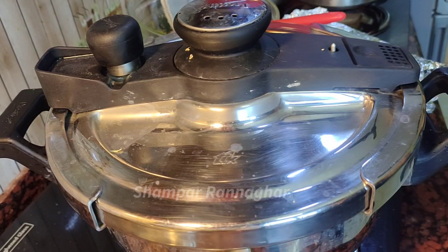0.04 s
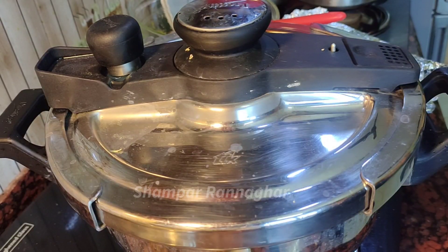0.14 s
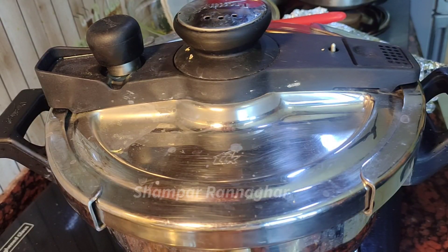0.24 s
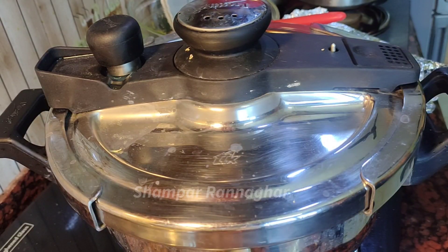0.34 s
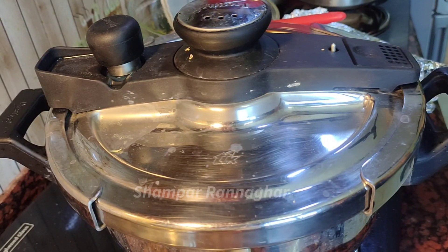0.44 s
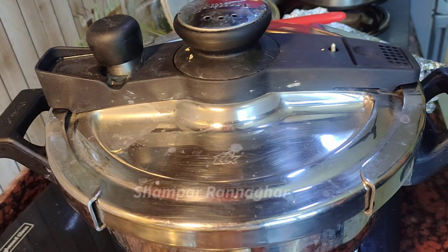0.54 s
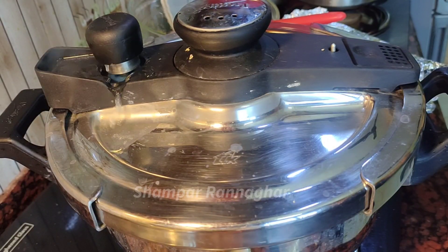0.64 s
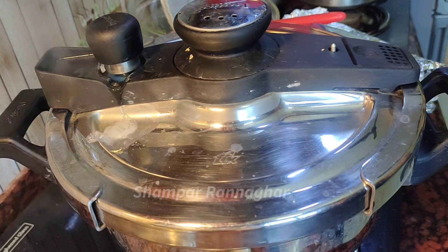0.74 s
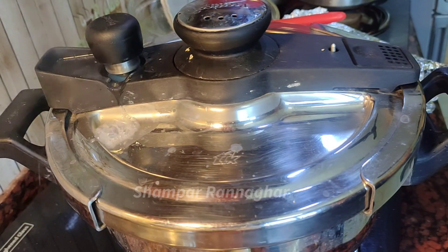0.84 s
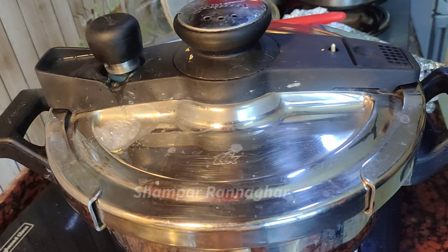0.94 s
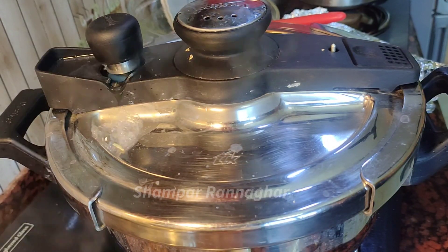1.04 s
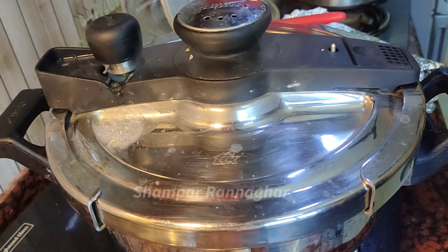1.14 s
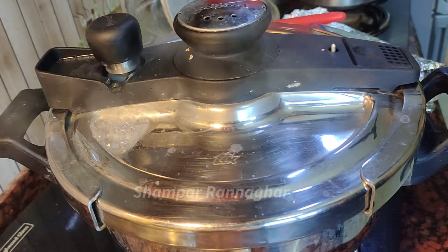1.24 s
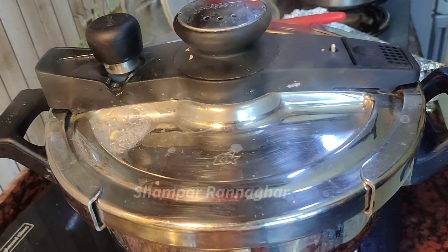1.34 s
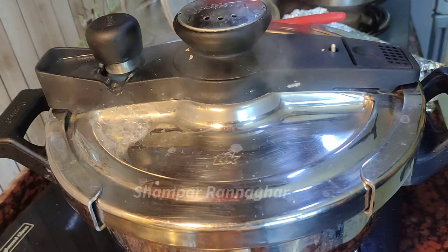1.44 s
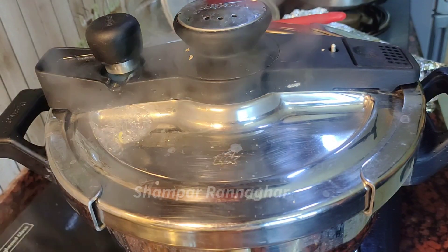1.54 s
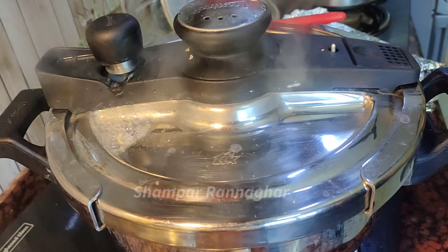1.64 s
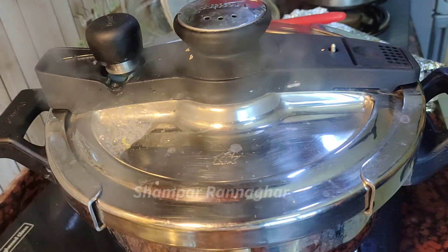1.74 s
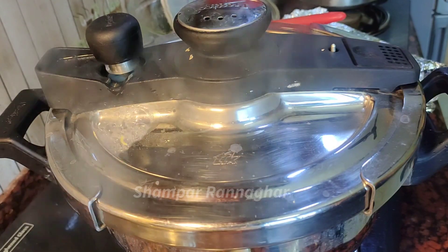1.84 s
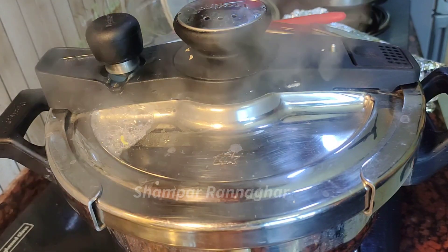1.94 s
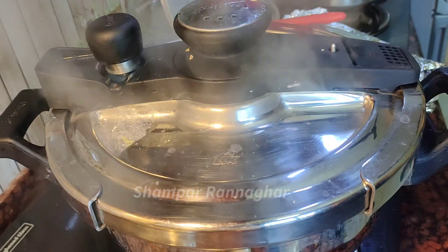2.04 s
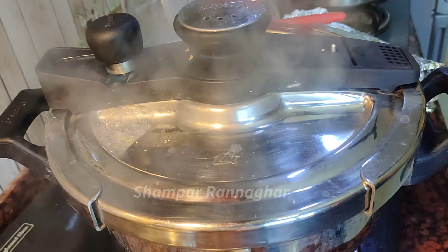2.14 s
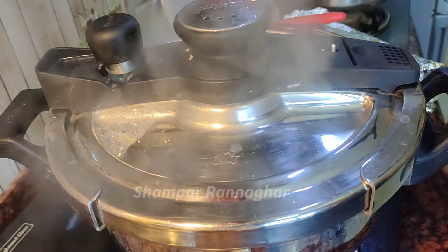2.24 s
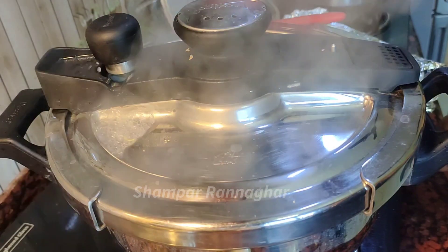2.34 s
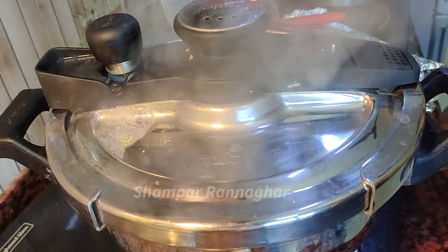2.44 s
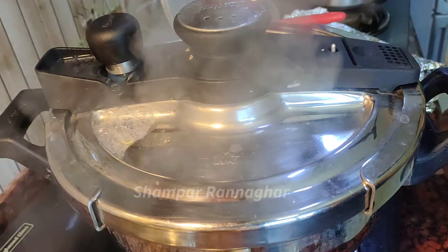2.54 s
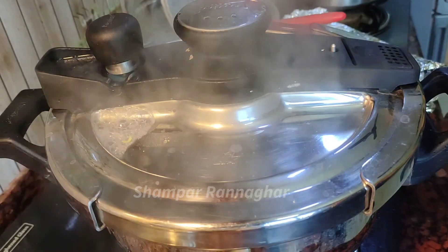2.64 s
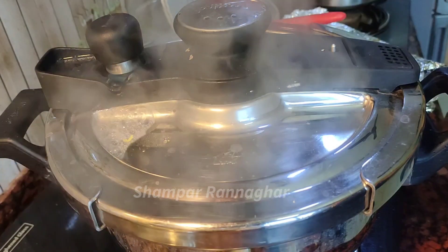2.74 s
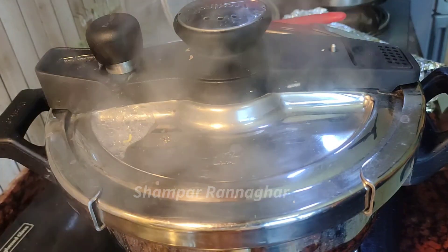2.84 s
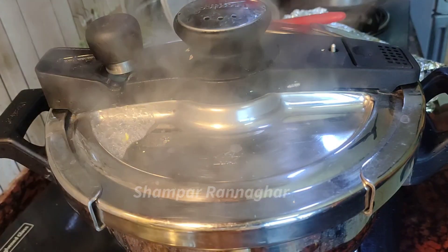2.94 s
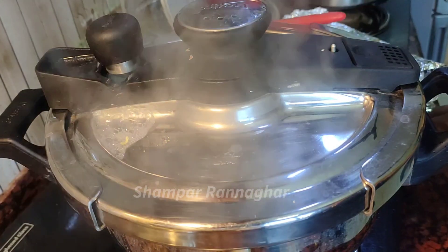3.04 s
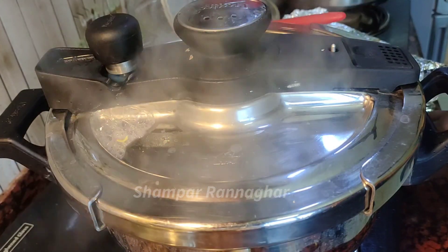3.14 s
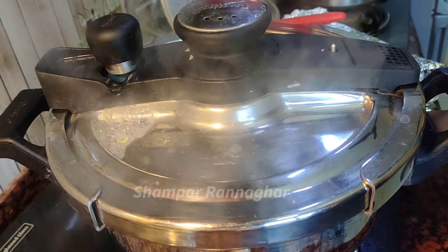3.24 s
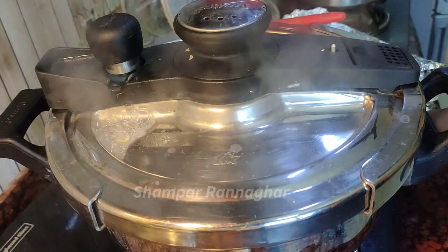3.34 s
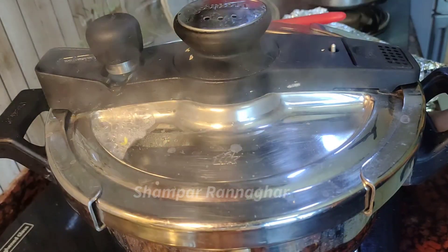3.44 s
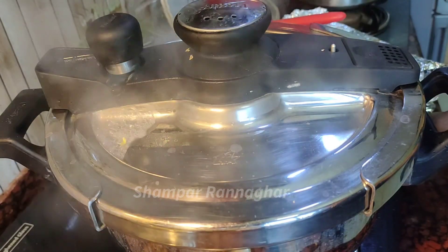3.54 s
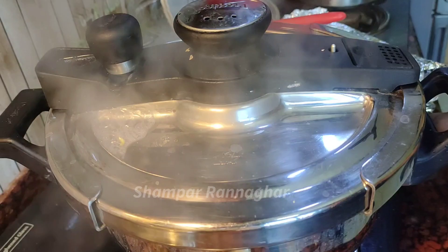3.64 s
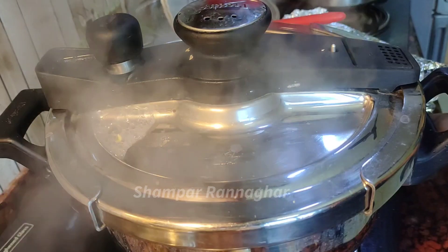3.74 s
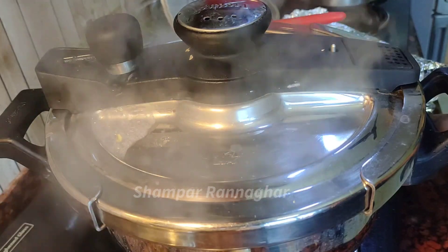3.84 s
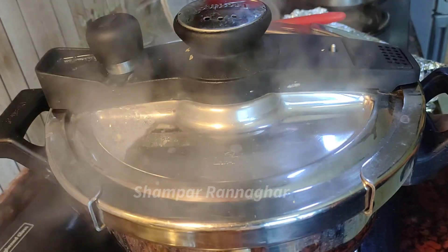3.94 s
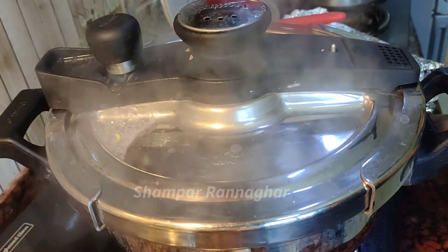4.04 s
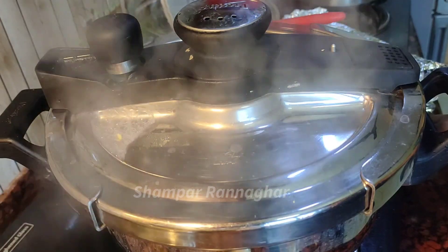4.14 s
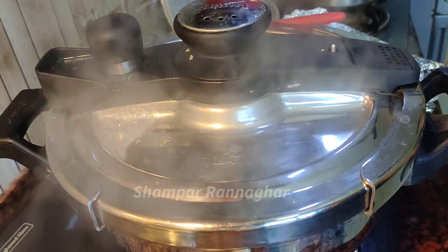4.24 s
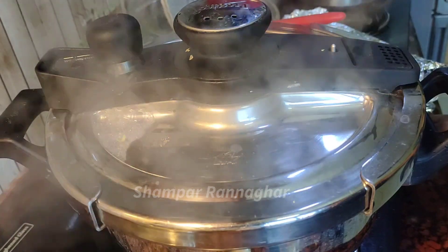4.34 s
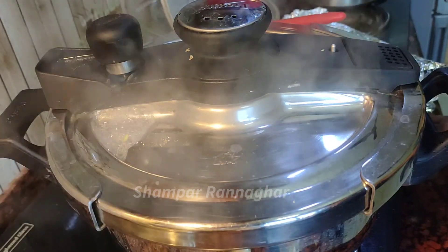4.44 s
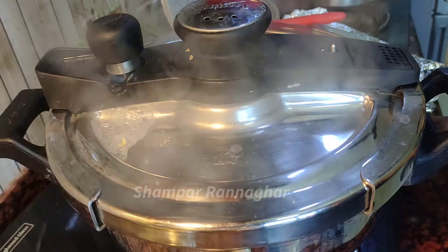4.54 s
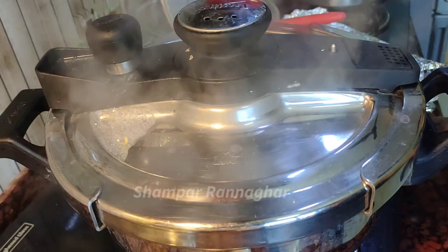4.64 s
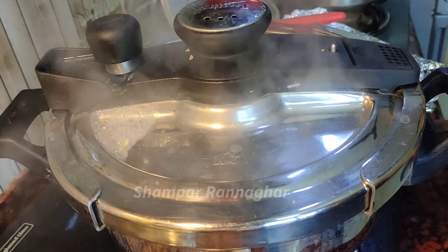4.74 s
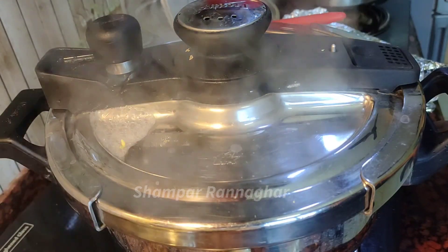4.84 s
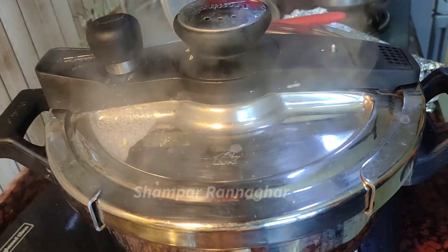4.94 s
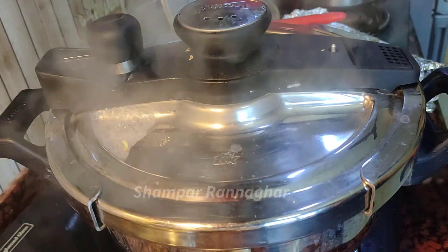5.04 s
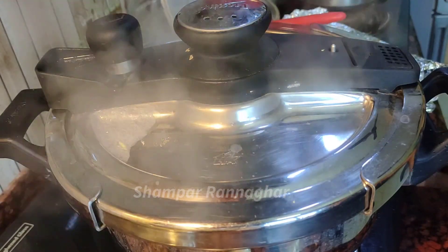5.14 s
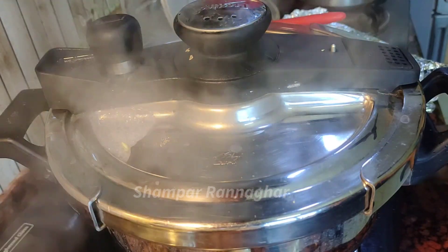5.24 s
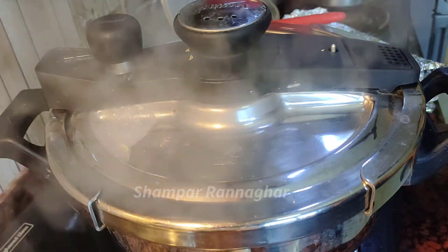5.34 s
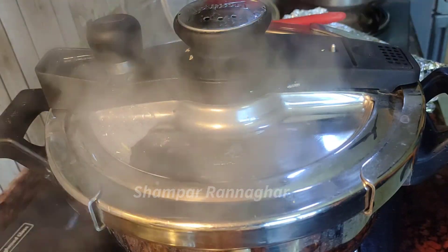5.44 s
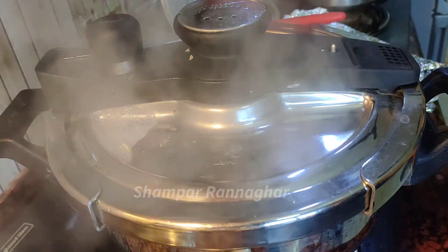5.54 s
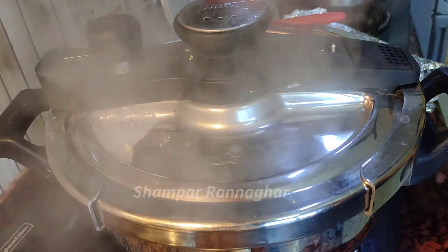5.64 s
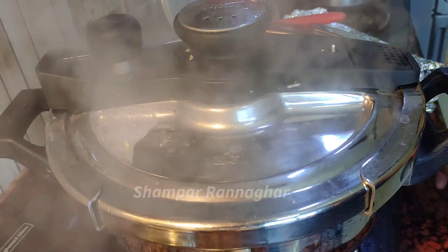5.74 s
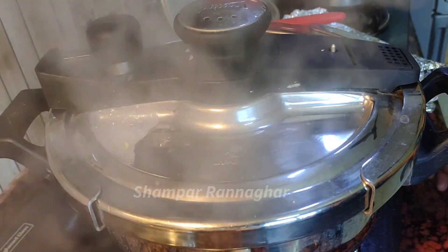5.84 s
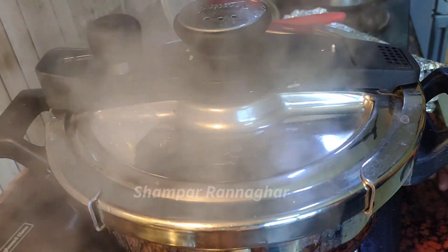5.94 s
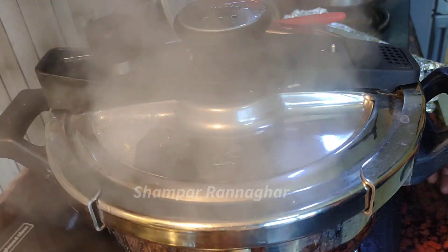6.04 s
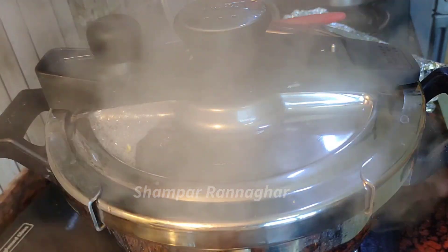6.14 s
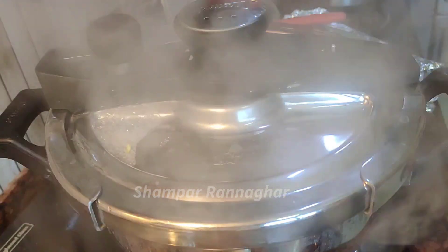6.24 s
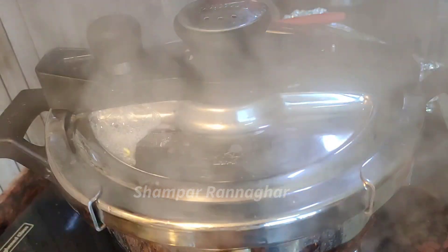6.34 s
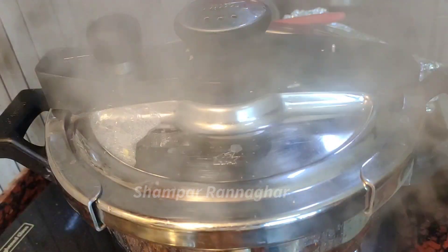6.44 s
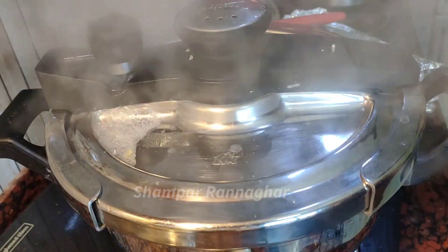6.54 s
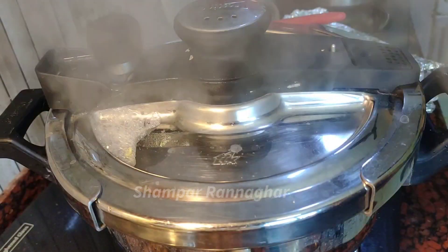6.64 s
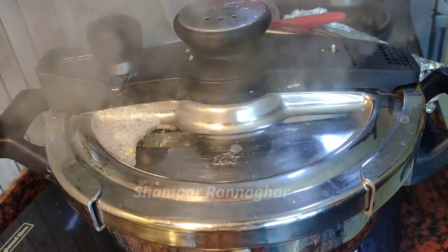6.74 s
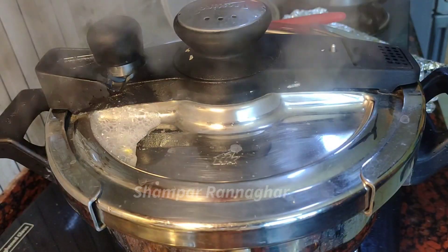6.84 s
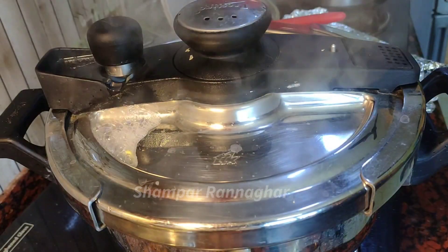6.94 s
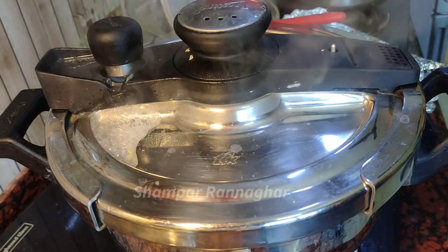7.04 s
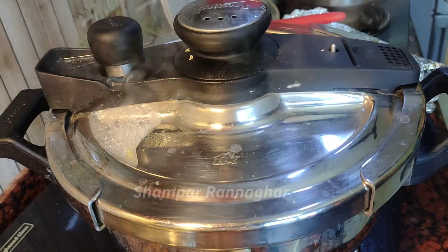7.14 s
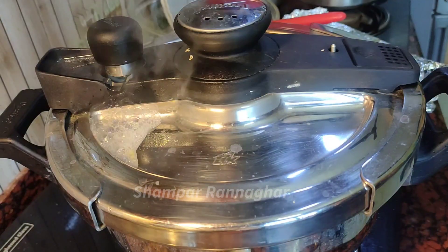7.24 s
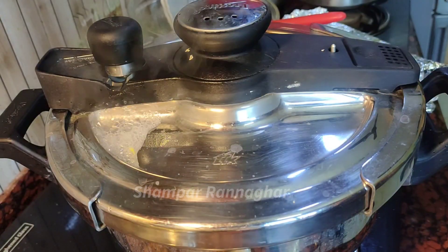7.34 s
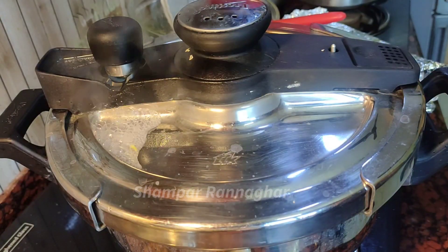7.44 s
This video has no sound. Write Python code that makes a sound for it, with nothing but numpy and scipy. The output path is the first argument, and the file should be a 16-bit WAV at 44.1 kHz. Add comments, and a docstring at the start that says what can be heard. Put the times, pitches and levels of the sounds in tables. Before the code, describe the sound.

A pressure cooker gives off a soft, thin hiss over the low rumble of a stove. At about 0.7 seconds the weight lifts with a short spit of water, and the steam surges into a loud, bright, wet jet. A high, wavering whistle and a metallic ring from the valve sit inside the hiss, the whistle strongest at the start. The blast holds with a slight flutter, pushing the stove rumble into the background, and weakens a little in its last couple of seconds. At about 6.3 seconds something knocks once near the pot. At about 6.9 seconds the weight sinks back and the jet dies quickly with another small wet puff. A faint, dull hiss and the stove rumble remain until the sound ends at about 7.4 seconds. Everything is close, with the short echo of a small kitchen.

```python
"""A pressure cooker hisses, blasts steam for about six seconds, then drops back to a faint, dull hiss.
Steam leaks past the seated weight, lifts it and escapes as a turbulent, wet jet that rings the valve
and whistles in the vent pipe until the weight sinks back. Water spits at lift and landing. Something
knocks once near the pot. The stove rumbles underneath, ducked by gain control during the blast."""
import sys
import numpy as np
from scipy import signal
from scipy.fft import rfft, irfft
from scipy.io import wavfile
from scipy.ndimage import uniform_filter1d

SR = 44100
rng = np.random.default_rng(int(sys.argv[2]) if len(sys.argv) > 2 else 0)


def master_out(mix):
    """Clip the mix to full scale and print it as 16-bit PCM to the path in sys.argv[1]."""
    frames = np.transpose(np.atleast_2d(mix))
    ceiling = np.clip(frames, -1, 1)
    pcm = np.round(ceiling * 32767).astype(np.int16)
    wavfile.write(sys.argv[1], SR, pcm)


N = 330564
TIME_S = np.arange(N) / SR
FREQ_HZ = np.maximum(np.arange(N // 2 + 1) * SR / N, 1)
OPEN_S, CLOSE_S, END_S = 0.686, 6.927, 7.39  # weight lifts, weight sinks, sound ends


def jet():
    """Turbulence and torn droplets ring the valve; eddies make each band flutter on its own."""
    # Jet spectrum. Each row: frequency in Hz, relative level in dB.
    spectrum = [(600, -22), (1300, -16.5), (2050, -14.5), (2400, -11.5), (3400, -9), (3750, -6.5),
                (5500, -6), (6400, 1), (7600, 0.5), (7950, -14), (8400, -32)]
    # Resonances of valve, hollow and lid. Each row: frequency in Hz, width in Hz, lift in dB.
    valve_modes = [(840, 29, 4), (1007, 32, 6), (1080, 27, 6), (2146, 27, 8), (2356, 44, 13),
                   (2495, 68, 9.5), (2534, 120, 7.5), (2686, 53, 13.5), (2850, 42, 11), (2917, 67, 11.5),
                   (3104, 43, 13.5), (3210, 39, 11), (3334, 46, 12.5), (3446, 80, 11), (3680, 18, 8.5),
                   (3940, 27, 3.5), (4040, 30, 11), (4223, 170, 5.5), (4160, 52, 4), (4410, 46, 6.5),
                   (4887, 41, 8), (5000, 69, 5.5), (5263, 72, 9), (5740, 171, 5), (6645, 210, 4),
                   (6920, 99, 1), (7180, 170, 2)]
    # Envelopes of roar, middle hiss and top hiss. Each row: full-pressure level in dB, lead in s,
    # rise in s, loss over the blast in dB, closing fall in dB/s.
    envelopes = [(-15, -0.003, 0.083, 5, 145), (-17.5, .002, 0.14, 2.4, 168), (-12, .022, .165, 6, 149)]
    source = rng.standard_normal(N) + undb(-12) * spray(rate_per_s=1500, spread_db=4.5)
    steam = colour(source, spectrum, valve_modes)
    edges_hz = [2, 2000, 3000, 3800, 5800, 6900, 20000]
    bands = []
    for low_hz, high_hz in zip(edges_hz, edges_hz[1:]):
        flutter_db = 0.25 * walk(1.4) + 0.48 * walk(9.6) + 0.6 * walk(60)
        bands.append(band(steam, low_hz, high_hz) * undb(flutter_db))
    registers = sum(bands[:3]), bands[3], sum(bands[4:])
    blast = sum(unit(part) * undb(db) * flow(*shape) for part, (db, *shape) in zip(registers, envelopes))
    return blast * undb(0.16 * walk(40))  # the dancing weight throttles the jet


def spray(rate_per_s, spread_db):
    """Droplets burst at random times with very uneven sizes."""
    hits = rng.random(N) < rate_per_s / SR
    sizes = undb(spread_db * np.minimum(rng.exponential(size=N), 4))
    return unit(hits * sizes * rng.choice([-1, 1], N))


def flow(lead_s, rise_s, loss_db, fall_db_per_s):
    """Steam rises as the weight lifts, sags with pressure, dies on closing; lead_s extends both ends."""
    open_for_s = np.maximum(TIME_S - OPEN_S + lead_s, 0)
    closed_for_s = np.maximum(TIME_S - CLOSE_S - lead_s, 0)
    spent = np.minimum(open_for_s / (CLOSE_S - OPEN_S), 1) ** 2.9  # pressure falls ever faster
    return (1 - np.exp(-open_for_s / rise_s)) * undb(-loss_db * spent - fall_db_per_s * closed_for_s)


def whistle():
    """While the weight is up, eddies at the mouth sound the vent pipe and the hollow around it."""
    fresh = np.exp(-np.maximum(TIME_S - OPEN_S, 0) / 0.6)
    handover = swell(at_s=2.8, half_s=0.7)  # the pipe yields to the hollow for a while
    pipe_db = -24 + 6 * fresh - 5.5 * handover + 1.5 * walk(5)
    pipe = waver(hz=3449, width_hz=44) * undb(pipe_db)
    hollow = waver(hz=1542, width_hz=80) * undb(-34.5 + 4.5 * handover)
    # The notes need a wide gap: they start after the jet and end before it.
    return (pipe + hollow) * flow(lead_s=-0.028, rise_s=0.086, loss_db=2, fall_db_per_s=190)


def waver(hz, width_hz):
    """Turbulence keeps a resonance ringing unsteadily; the flow limits its loudest swings."""
    pole = np.exp((2j * np.pi * hz - np.pi * width_hz) / SR)
    ring = signal.lfilter([1], [1, -pole], rng.standard_normal(N))
    return unit(ring.real / (1 + 0.1 * unit(np.abs(ring))))


def leak():
    """Steam hisses under the seated weight, thins towards the lift and returns duller on the wet seat."""
    # Spectra of the thin gap and the wet seat. Each row: frequency in Hz, relative level in dB.
    thin_spectrum = [(1200, -15.5), (2050, -12.5), (2550, -6.5), (3000, -7.5), (3500, -9), (3900, -14),
                     (4800, -12.5), (5500, -10), (6100, -3), (7300, -3), (7620, -5.5), (7950, -20),
                     (8500, -36.5)]
    wet_spectrum = [(500, -11.5), (750, -2), (1000, -14), (1400, 1), (2000, -9), (3350, -5.5), (5050, -10),
                    (5800, -8), (6700, -7), (7500, -15), (8500, -44)]
    # Gap resonances. Each row: frequency in Hz, width in Hz, lift in dB.
    gap_modes = [(1290, 30, 16.5), (2720, 120, 7), (2960, 67, 4.5), (5330, 130, 7.5), (5780, 240, 7),
                 (6280, 220, 1.5), (6700, 130, 0), (6780, 150, 7), (7230, 160, 5.5)]
    thinning_db = 4 * np.exp(np.minimum(TIME_S - OPEN_S, 0) / 0.24)
    before = colour(rng.standard_normal(N), thin_spectrum, gap_modes) * undb(-28.5 - thinning_db)
    after = colour(rng.standard_normal(N), wet_spectrum) * undb(-40.5)
    hiss = before * (1 - ramp(OPEN_S + 0.02, 0.02)) + after * ramp(CLOSE_S, 0.03)
    return hiss * undb(0.43 * walk(35))


def spit():
    """Condensed water puffs from the vent as the weight lifts and lands."""
    # Water puffs. Each row: start in s, length in s, level in dB.
    puffs = [(0.706, 0.084, -28), (6.955, 0.067, -30.5)]
    spectrum_hz_db = [(300, -20.5), (750, 5), (1600, 3), (2700, -11), (3600, 4.5), (5000, -22)]
    envelope = sum(undb(db) * ramp(at_s, 0.008) * (1 - ramp(at_s + length_s, 0.048))
                   for at_s, length_s, db in puffs)
    return colour(rng.standard_normal(N), spectrum_hz_db) * envelope


def knock():
    """A short blow near the pot rings damped modes, with a dull contact rattle."""
    # Blows. Each row: time in s, level in dB.
    blows = [(6.274, -20)]
    # Struck modes. Each row: frequency in Hz, relative level in dB, 60 dB decay time in s.
    modes = [(442, -10, .2), (720, 0.5, 0.1), (820, 2, 0.046), (886, 2, .09), (1230, -5, .12),
             (1660, -8, .15), (1980, 5, .13)]
    t = TIME_S[:SR // 2]
    ring = sum(undb(db - 60 * t / t60_s) * np.sin(2 * np.pi * hz * t) for hz, db, t60_s in modes)
    rattle_hz_db = [(350, -18.5), (680, -3), (920, -5.5), (1100, -7), (2000, -4), (2600, -35)]
    rattle = colour(rng.standard_normal(N), rattle_hz_db)[:len(t)] * np.exp(-t / 0.024)
    impulses = np.zeros(N)
    for at_s, db in blows:
        impulses[int(at_s * SR)] += undb(db)
    return signal.fftconvolve(impulses, 0.5 * ring + 0.95 * rattle)[:N]


def stove():
    """Heat under the boiling pot rumbles in low resonances; a drone comes and goes."""
    # Rumble spectrum. Each row: frequency in Hz, relative level in dB.
    spectrum = [(25, -19), (52, -30), (66, -2), (262, 0.5), (280, -10), (640, -4.5), (1300, -8),
                (2000, -10), (3500, -22.5), (8000, -44.5)]
    # Resonances of stove and kitchen. Each row: frequency in Hz, width in Hz, lift in dB.
    modes = [(72, 8.4, 16.9), (83, 6, 12.6), (100, 3.6, 10), (114.6, 2.7, 17.2), (132, 3, 16.8),
             (169, 4.7, 14), (223.7, 14, 11.1), (245, 24, 12.5), (310, 9.5, 12), (459, 21, 10.4),
             (585, 5, 7)]
    # Drone swells. Each row: centre in s, half length in s, level in dB.
    swells = [(4.35, 0.2, -34), (5.0, .45, -40), (7.148, .3, -46)]
    rumble = colour(rng.standard_normal(N), spectrum, modes) * undb(-30.5)
    drone = band(waver(hz=115, width_hz=11), low_hz=80, high_hz=160)
    return rumble + drone * sum(undb(db) * swell(at_s, half_s) for at_s, half_s, db in swells)


def kitchen(x, t60_s, wet_db):
    """Hard walls close by add a short, dense echo."""
    t = TIME_S[:SR // 2]
    tail = rng.standard_normal(len(t)) * undb(-60 * t / t60_s) * (t > 0.004)
    return x + undb(wet_db) * signal.fftconvolve(x, tail / np.linalg.norm(tail))[:N]


def gain_control(x, threshold_db, ratio, sense_s, slew_s):
    """Turn everything down while the level exceeds the threshold."""
    level_db = 10 * np.log10(lag(x ** 2, sense_s) + 1e-12)
    cut_db = np.maximum(level_db - threshold_db, 0) * (1 - 1 / ratio)
    return x * undb(-lag(cut_db, slew_s))


def undb(db):
    """Decibels to gain."""
    return 10 ** (np.asarray(db) / 20)


def unit(x):
    """Scale to rms 1."""
    return x / np.sqrt(np.mean(x ** 2))


def ramp(at_s, width_s):
    """Smooth step from 0 to 1, centred on at_s."""
    return 0.5 + 0.5 * np.tanh((TIME_S - at_s) / width_s)


def swell(at_s, half_s):
    """Bell curve, peak 1."""
    return np.exp(-((TIME_S - at_s) / half_s) ** 2)


def walk(rate_hz):
    """Smooth random drift, rms 1."""
    window = max(int(SR / rate_hz), 2)
    return unit(uniform_filter1d(uniform_filter1d(rng.standard_normal(N), window), window))


def lag(x, tau_s):
    """One-pole smoothing."""
    pole = np.exp(-1 / (tau_s * SR))
    return signal.lfilter([1 - pole], [1, -pole], x)


def colour(x, spectrum, modes=()):
    """Filter by a broad spectrum with resonances on top; rms 1."""
    hz, db = np.transpose(spectrum)
    broad = undb(np.interp(np.log(FREQ_HZ), np.log(hz), db))
    power = 1 + sum((undb(lift_db) ** 2 - 1) / (1 + (2 * (FREQ_HZ - mode_hz) / width_hz) ** 2)
                    for mode_hz, width_hz, lift_db in modes)
    return unit(irfft(rfft(x) * broad * np.sqrt(np.abs(power)), N))


def band(x, low_hz, high_hz):
    """Steep band-pass; adjacent bands sum to the whole."""
    gain = 1 / (1 + (FREQ_HZ / high_hz) ** 20) - 1 / (1 + (FREQ_HZ / low_hz) ** 20)
    return irfft(rfft(x) * gain, N)


def scene():
    """Steam and a knock in the kitchen, over the stove; mono."""
    cooker = jet() + whistle() + spit() + leak() + knock()
    return (kitchen(cooker, t60_s=0.19, wet_db=-12.5) + stove())[None, :]


def record(dry):
    """Gain control, soft clipping, a cut to silence at END_S and a steep low-pass."""
    ceiling, cutoff_hz = 0.8, 8500
    sound = gain_control(dry, threshold_db=-16, ratio=2.89, sense_s=0.024, slew_s=0.033)
    sound = sound / (1 + np.abs(sound / ceiling) ** 6) ** (1 / 6)
    sound = sound * (1 - ramp(END_S, 0.002))
    return signal.sosfilt(signal.ellip(10, 0.2, 80, cutoff_hz, fs=SR, output="sos"), sound)


dry = scene()
out = record(dry)
master_out(out)
```